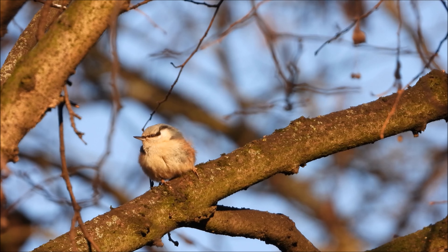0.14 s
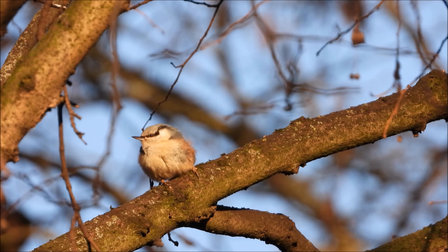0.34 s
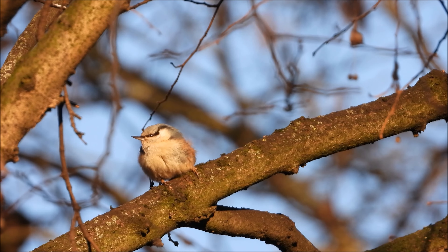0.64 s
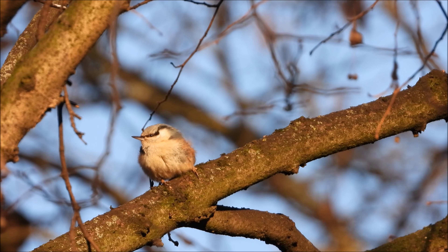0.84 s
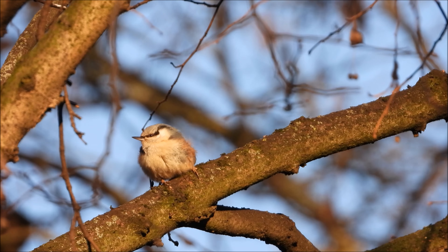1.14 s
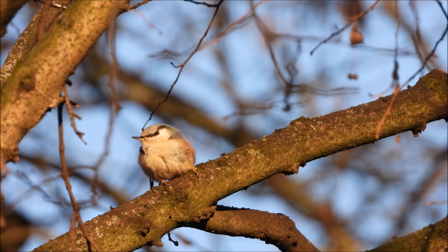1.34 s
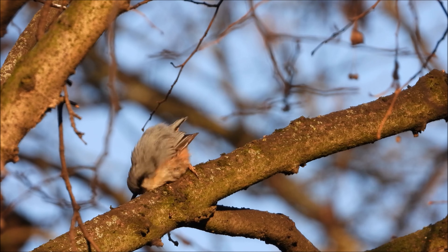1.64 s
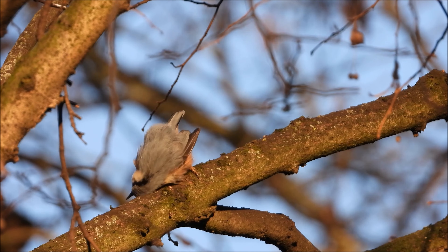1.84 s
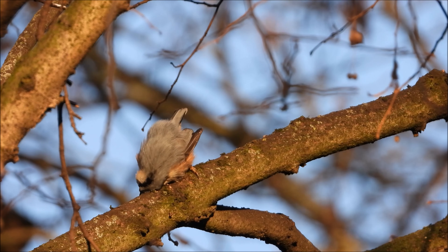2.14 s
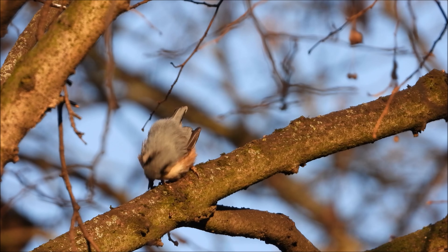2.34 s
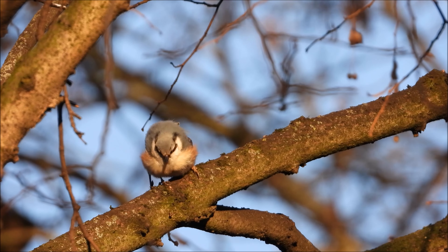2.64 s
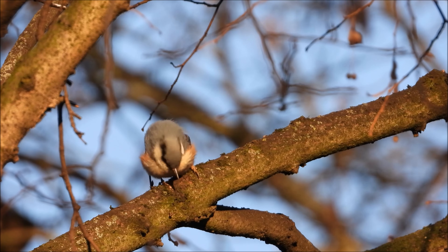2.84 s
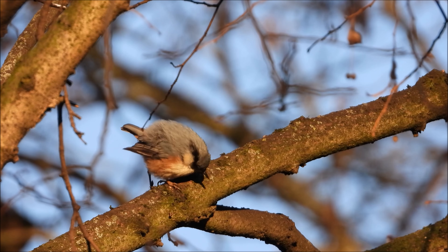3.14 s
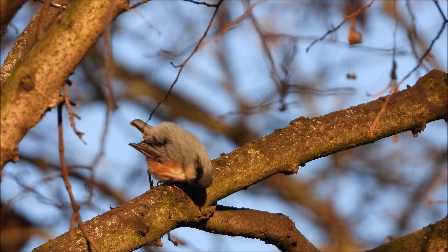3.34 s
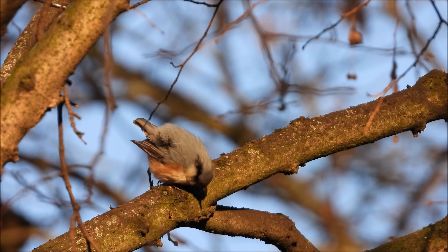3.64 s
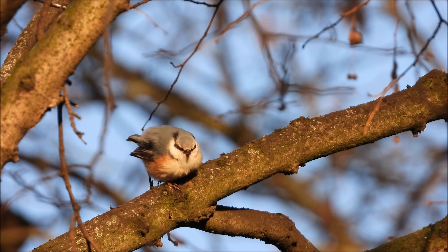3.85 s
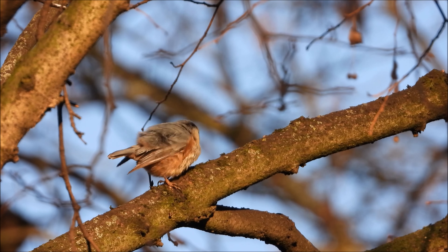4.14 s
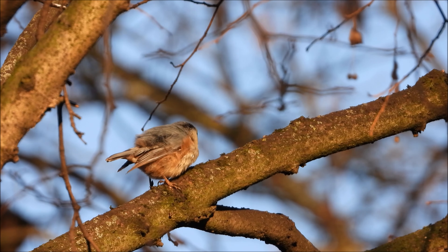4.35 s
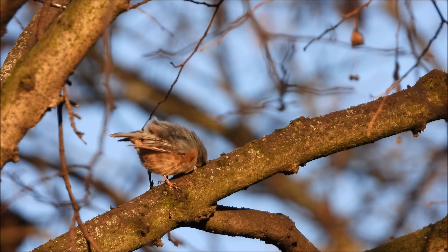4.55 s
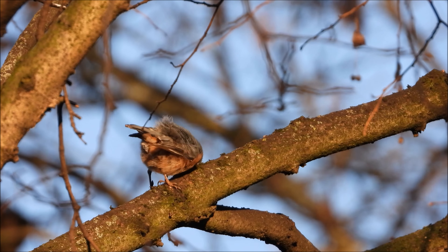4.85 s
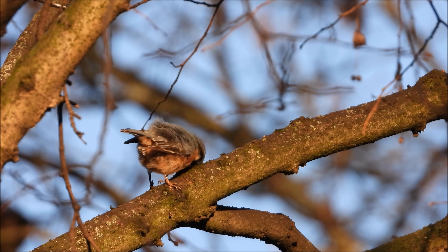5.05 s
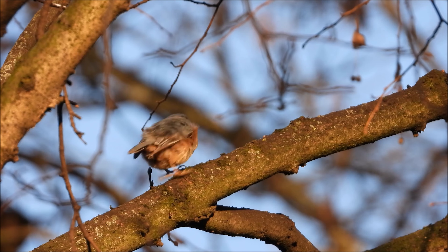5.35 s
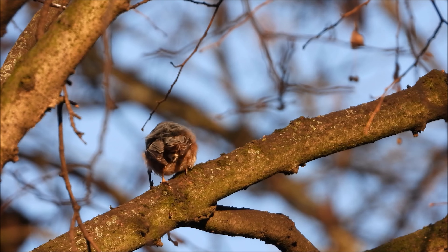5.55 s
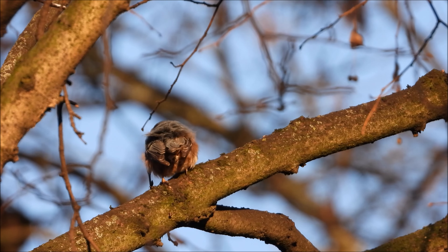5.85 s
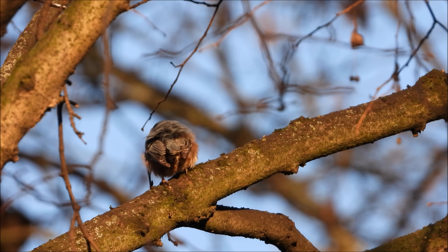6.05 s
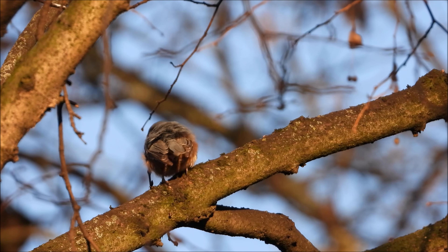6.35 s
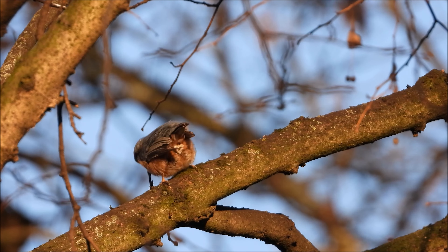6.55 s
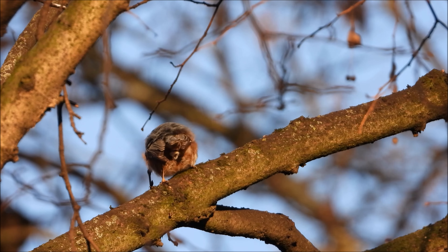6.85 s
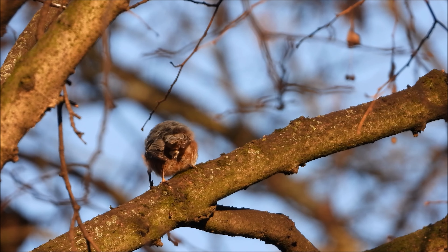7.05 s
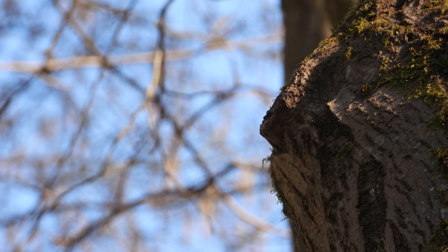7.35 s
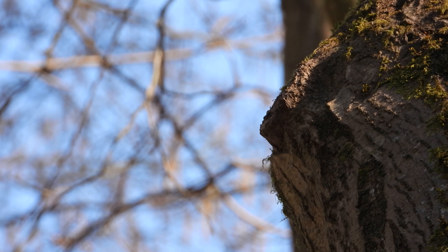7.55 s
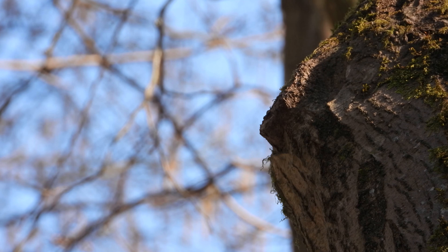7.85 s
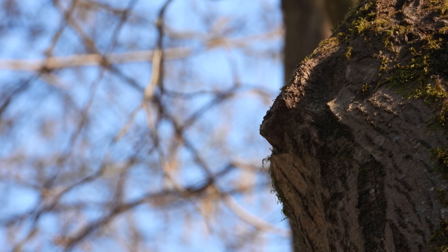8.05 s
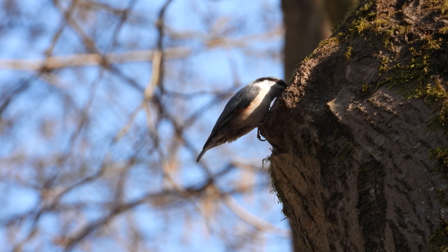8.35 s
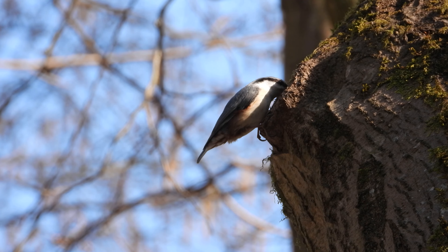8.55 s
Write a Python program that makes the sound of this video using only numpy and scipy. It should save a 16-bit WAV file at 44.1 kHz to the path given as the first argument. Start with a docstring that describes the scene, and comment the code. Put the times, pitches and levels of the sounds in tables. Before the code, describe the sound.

In a wood, a small bird repeats a high pip, pure whistle and falling buzz about twice a second, stopping after five seconds. Further off, another bird sings fluted glides and hoarse slurs that echo among the trees and carry on to the end. Thin calls and a faint trill join later. Distant traffic and a low rumble of air on the microphone lie underneath.

```python
"""Songbirds in a bare wood.

A tit repeats a pip, a pure whistle and a falling buzz twice a second. Further off, a thrush sings fluted
glides and hoarse slurs, and small birds add thin calls. Each note is one gliding syrinx tone; trunks
scatter it into a short tail. One dry tick. Beneath: far traffic, a hum, air rumble on the microphone."""
import sys
import numpy as np
from scipy import signal
from scipy.fft import rfft, irfft, next_fast_len
from scipy.io import wavfile
from scipy.ndimage import uniform_filter1d, map_coordinates

SR = 44100
rng = np.random.default_rng(int(sys.argv[2]) if len(sys.argv) > 2 else 0)


def master(y):
    """Save y as 16-bit WAV."""
    cut = np.clip(np.atleast_2d(y).T, -1, 1)
    pcm = np.round(cut * 32767)  # scale
    wavfile.write(sys.argv[1], SR, pcm.astype(np.int16))


N = 384111

# distant traffic and leaves: f/Hz, relative density/dB
HUSH_SPECTRUM = [(36, -1.5), (51, 9), (78, -11), (110, -8.5), (155, -18), (300, -11), (480, -14),
                 (750, -16.5), (1150, -25.5), (1600, -33), (3000, -33.5), (8000, -43.5), (11700, -43.5),
                 (12400, -61)]
# far hum: t/s, level/dB
HUM_ENVELOPE = [(0, -95.5), (2.5, -82), (3, -77.5), (4.4, -77.5), (5, -81), (5.8, -74.5), (7.2, -76.5),
                (8.7, -88.5)]
# gusts on the microphone: peak t/s, half-width/s, level/dB
AIR_GUSTS = [(.22, .06, -27), (1.2, .2, -47), (5.55, .05, -32), (5.73, .09, -28), (7.08, .06, -39)]
# air rumble: f/Hz, relative density/dB
AIR_SPECTRUM = [(4, -33), (9, 3.5), (15, 1), (21, 4), (29, -23), (38, -40), (80, -54.5), (200, -103.5)]
# tit phrases: whistle t/s, whistle level/dB, whistle f/Hz, pip level/dB, buzz t/s, buzz level/dB
TIT_PHRASES = [ (0.132, -56, 4276, -76, .329, -51.5), (0.641, -48.5, 4290, -67.5, .828, -45.5),
               (1.119, -42.5, 4236, -56, 1.305, -48.5), (1.602, -41.5, 4216, -61.5, 1.783, -48),
               (2.102, -40, 4208, -63.5, 2.285, -47), (2.588, -41, 4220, -62.5, 2.777, -46),
               (3.063, -43, 4212, -63, 3.251, -48), (3.55, -43.5, 4208, -58, 3.738, -49),
               (4.061, -50.5, 4200, -62.5, 4.252, -48.5), (4.554, -44.5, 4214, -57.5, 4.753, -49.5),
               (5.05, -46.5, 4200, -54, 5.242, -51.5)]
# tit pip: t/s from onset, f/Hz, relative level/dB
PIP_SHAPE = [(0, 3600, -13.5), (.01, 3540, 0.5), (.018, 3670, 4), (.026, 3780, -7.5)]
# tit whistle: t/s from onset, nominal f/Hz, relative level/dB
WHISTLE_SHAPE = [(0, 4010, -22), (.015, 4130, -7), (.036, 4210, 0), (.06, 4220, -.5), (.073, 4210, -1.5),
                 (.082, 4200, -11)]
# tit buzz: t/s from onset, nominal f/Hz, relative level/dB
BUZZ_SHAPE = [(0, 5850, -12), (.005, 5550, -6), (.01, 5080, -3), (.016, 4730, -.5), (.045, 4570, -1),
              (.075, 4420, .5), (.098, 4390, -1), (.11, 4400, -12)]
# fluted notes: t/s, length/s, start f/Hz, mid f/Hz, end f/Hz, relative level/dB, swell/dB,
# echo send/dB, roughness
THRUSH_NOTES = [ (0.848, 0.1, 1507, 1903, 1920, -51.5, 12.5, 5, 0.46),
                (1.07, 0.067, 2386, 2010, 1660, -50, -3.5, 6.5, 0.46),
                (1.164, 0.073, 2113, 2342, 2320, -43, 6.5, -0.5, 0),
                (1.31, 0.09, 2790, 2842, 2870, -52, -2.5, 3.5, 0.2),
                (1.409, 0.055, 2900, 2467, 1590, -50, -9.5, 7.5, 0.54),
                (1.723, 0.18, 1334, 1763, 1636, -51, 19, 2, 0.38),
                (2.137, 0.16, 1994, 2230, 2240, -48.5, -10, 0, 0.19),
                (2.302, 0.17, 2220, 1848, 1667, -49.5, -10, 0, 0.31),
                (2.739, .16, 2586, 2107, 1916, -49, 14.5, 4, .1),
                (3.194, 0.069, 2397, 2210, 2213, -44, 7, -5, 0),
                (3.386, .145, 2778, 2760, 2306, -56, 13.5, 5, 0.13),
                (5.219, 0.15, 1797, 1958, 2043, -73, 18, 10, 0.15),
                (5.618, 0.04, 2250, 2020, 1640, -47.5, -1.5, 1, 1.08),
                (5.699, 0.14, 1447, 1897, 1892, -51.5, 10.5, 3, 0.45),
                (5.987, .057, 2188, 1776, 1483, -52.5, -7, 6.5, 0.74),
                (6.043, .095, 1550, 2172, 2337, -47.5, 12.5, 3, 0.2),
                (6.228, .1, 2794, 2806, 2741, -53.5, 5, 6, 0.02),
                (6.332, .052, 2808, 2390, 1625, -48, -7, 4.5, 0.7),
                (6.628, 0.072, 1340, 1490, 1760, -54.5, 17, -1, 0.4),
                (6.686, 0.2, 1740, 1850, 1695, -47, -2, -0.5, 0.45),
                (7.054, 0.091, 2178, 2187, 2132, -44, -5, -10.5, 0.08),
                (7.879, 0.15, 3010, 2735, 2530, -51.5, 3, -1.5, 0.32),
                (8.674, 0.051, 2205, 2360, 2460, -59.5, 11, 8, 0.4)]
# hoarse slurs: t/s, length/s, start f/Hz, end f/Hz, relative level/dB
THRUSH_SLURS = [ (0.661, 0.04, 3100, 2480, -60), (0.714, .024, 1887, 3990, -52.5),
                (0.749, 0.021, 3700, 2690, -59.5), (0.774, 0.035, 2320, 1820, -48.5),
                (0.862, .04, 2535, 2795, -52), (0.91, 0.021, 2740, 3770, -57.5),
                (0.963, .018, 3980, 2680, -51), (0.967, .035, 2800, 2035, -52.5),
                (1.608, 0.06, 3600, 2450, -60.5), (1.668, 0.064, 2457, 3250, -59.5),
                (1.752, 0.053, 3010, 2114, -61), (2.042, 0.072, 1540, 1335, -61.5),
                (2.09, 0.029, 2070, 2930, -65.5), (2.095, 0.03, 1323, 1380, -62.5),
                (2.907, 0.028, 1940, 1570, -50.5), (3.054, 0.05, 1820, 1222, -57.5),
                (3.088, 0.071, 1260, 1460, -68), (3.131, 0.035, 1517, 2034, -60.5),
                (3.173, .028, 1652, 2734, -51.5), (3.518, 0.037, 2350, 1370, -58),
                (4.574, 0.022, 1570, 2870, -61), (4.597, .078, 2620, 2570, -67.5),
                (4.601, 0.079, 1380, 1237, -79.5), (4.754, 0.032, 2365, 1750, -64.5),
                (4.759, 0.027, 3460, 2840, -62.5), (4.788, 0.057, 1590, 1490, -75),
                (4.918, 0.029, 2074, 2410, -65), (4.921, 0.022, 3150, 2680, -62),
                (5.003, 0.087, 3090, 2430, -63.5), (5.351, .028, 2035, 2930, -54),
                (5.375, 0.12, 1735, 1430, -73.5), (5.571, 0.029, 2930, 2960, -62),
                (6.088, 0.025, 2310, 2850, -65), (6.378, 0.034, 2660, 3460, -55.5),
                (6.409, 0.041, 2340, 2987, -48), (6.498, 0.031, 2950, 3930, -58.5),
                (6.53, 0.029, 2530, 3264, -48), (6.599, 0.092, 3176, 2804, -52),
                (6.709, 0.04, 2800, 2496, -48.5), (6.841, 0.013, 4540, 3700, -68),
                (6.856, 0.036, 3650, 3460, -60.5), (6.865, 0.1, 2947, 3375, -56),
                (6.971, 0.075, 2353, 2954, -55.5), (7.62, 0.051, 1880, 2335, -73.5),
                (7.621, 0.044, 2904, 3560, -62.5), (7.654, 0.028, 2220, 3220, -55),
                (7.746, 0.027, 3020, 3720, -55.5), (7.769, 0.034, 2420, 3300, -52.5),
                (7.85, 0.038, 3150, 3094, -54), (8.115, 0.017, 4960, 3340, -67),
                (8.135, 0.034, 2917, 2176, -61), (8.171, 0.093, 2600, 3270, -61),
                (8.25, 0.061, 3350, 3364, -62.5)]
# echo of an earlier phrase dying in the trees: f/Hz, relative density/dB
LINGER_SPECTRUM = [(1400, -35), (1750, -9.5), (1950, 6), (2250, -15.5), (2550, -2.5), (2950, 0),
                   (3250, -20), (4000, -34)]
# faint far calls: t/s, length/s, start f/Hz, end f/Hz, level/dB
FAR_GLIDES = [ (3.605, 0.038, 8900, 7030, -88), (4.458, 0.18, 2326, 2270, -83.5),
              (5.477, 0.39, 8000, 7540, -102), (5.988, 0.075, 7200, 6000, -94),
              (6.143, 0.04, 7530, 4930, -76), (6.257, 0.042, 6050, 5320, -68),
              (6.287, 0.021, 5650, 3500, -63.5), (6.257, .24, 7880, 7500, -87.5),
              (6.786, 0.032, 8000, 7300, -92), (8.364, 0.16, 4260, 4305, -75)]
# thin buzzy call: t/s, f/Hz, relative level/dB
HIGH_BUZZ_SHAPE = [(1.92, 7340, -70.5), (1.98, 7100, -77), (2.0, 6040, -72), (2.03, 6900, -103)]
# one trill note: t/s from onset, f/Hz, relative level/dB
TRILL_SHAPE = [(0, 5650, -76.5), (.02, 5320, -71), (.04, 5200, -75.5)]
# dry tick: f/Hz, relative density/dB
TICK_SPECTRUM = [(2000, -20), (3200, -8), (5500, -3), (7500, 0), (9800, 0), (12000, -8), (13000, -21),
                 (16000, -26)]


def undb(db):
    """Decibels to gain."""
    return 10 ** (np.asarray(db) / 20)


def noise(spectrum):
    """Unit-rms noise shaped by (f/Hz, density/dB) rows."""
    hz, db = np.transpose(spectrum)
    size = next_fast_len(N)
    bins_hz = np.maximum(np.fft.rfftfreq(size, 1 / SR), 1)
    gain = undb(np.interp(np.log(bins_hz), np.log(hz), db))
    shaped = irfft(rfft(rng.standard_normal(size)) * gain, size)[:N]
    return shaped / np.sqrt(np.mean(shaped ** 2))


def wander(t, rate_hz):
    """Smooth random curve, spread near 1."""
    knots = rng.standard_normal(1024)
    return map_coordinates(knots, [t * rate_hz], order=3, mode="wrap")


def glide(length_s, start_hz, end_hz, mid_hz=None, swell_db=0,
          edge_db=-9.5, attack_s=.014, release_s=.017):
    """Note shape (t/s, f/Hz, level/dB): one pitch arc under attack, sloping hold and release."""
    u = np.linspace(0, 1, 41)
    t = u * length_s
    bow_hz = 0 if mid_hz is None else mid_hz - (start_hz + end_hz) / 2
    hz = start_hz + (end_hz - start_hz) * u + bow_hz * (1 - (2 * u - 1) ** 2)
    edges = np.maximum(1 - t / attack_s, 0) ** 2 + np.maximum(1 - (length_s - t) / release_s, 0) ** 2
    return np.column_stack([t, hz, swell_db * (u - .5) + edge_db * edges])


def syrinx(track, shape, at_s=0, db=0, pitch_ratio=1, swing_hz=0, flutter_hz=222.7,
           waver=.0086, waver_rate_hz=130, tremor_db=0):
    """Add one gliding tone to track. Regular flutter makes it buzz; quick random waver, hoarse."""
    times_s, pitch_hz, level_db = np.transpose(shape)
    t = np.arange(max(int((times_s[-1] - times_s[0]) * SR), 256)) / SR
    hz = pitch_ratio * uniform_filter1d(np.interp(t + times_s[0], times_s, pitch_hz), size=256)
    flutter = np.sin(2 * np.pi * np.cumsum(flutter_hz * (1 + .07 * wander(t, 60))) / SR)
    hz = hz * (1 + waver * wander(t, waver_rate_hz)) + swing_hz * flutter
    fades = np.sin(np.pi / 2 * np.clip(np.minimum(t, t[-1] - t) / .004, 0, 1)) ** 2
    envelope_db = db + np.interp(t + times_s[0], times_s, level_db) + tremor_db * wander(t, 106.8)
    tone = np.sqrt(2) * fades * undb(envelope_db) * np.sin(2 * np.pi * np.cumsum(hz) / SR)
    start = int(np.clip((at_s + times_s[0]) * SR, 0, N))
    track[start:start + len(tone)] += tone[:N - start]


def echoes(x, wet_db, t60_s, build_s, cutoff_hz=16000):
    """Uneven, low-passed scatter from trunks and branches; builds, then decays. No direct sound."""
    t = np.arange(int(1.5 * SR)) / SR
    scatter = rng.standard_normal(len(t)) * undb(2 * wander(t, 90))
    response = scatter * (1 - np.exp(-t / build_s)) * undb(-60 * t / t60_s)
    lowpass = signal.butter(10, cutoff_hz, fs=SR, output="sos")
    response = signal.sosfilt(lowpass, response / np.linalg.norm(response))
    return undb(wet_db) * signal.fftconvolve(x, response)[:N]


def background(hush_db=-63, hum_hz=432.6, air_db=-41):
    """Hush of traffic and leaves, a wavering far hum, air pressing on the microphone."""
    t = np.arange(N) / SR
    hush = noise(HUSH_SPECTRUM) * undb(hush_db + .6 * wander(t, 1.5))
    hum = np.sqrt(2) * np.sin(2 * np.pi * np.cumsum(hum_hz + 3 * wander(t, 14)) / SR)
    hum *= undb(np.interp(t, *np.transpose(HUM_ENVELOPE)) + 2 * wander(t, 8))
    gusts = sum(undb(db) * np.exp(-((t - peak_s) / width_s) ** 2) for peak_s, width_s, db in AIR_GUSTS)
    return hush + hum + noise(AIR_SPECTRUM) * (undb(air_db) + gusts)


def tit(pip_lead_s=.038, send_pivot_db=-42, send_slope=.41, buzz_spread=.012, swing_hz=255):
    """Pip, whistle and falling buzz, nearly alike in every phrase."""
    direct, send, buzzes = np.zeros((3, N))
    for whistle_s, whistle_db, whistle_hz, pip_db, buzz_s, buzz_db in TIT_PHRASES:
        ratio = whistle_hz / WHISTLE_SHAPE[2][1]
        syrinx(direct, WHISTLE_SHAPE, whistle_s, whistle_db, ratio, waver=.001)
        # head turns vary the direct whistle more than the sound sent into the trees
        send_db = send_pivot_db + send_slope * (whistle_db - send_pivot_db)
        syrinx(send, WHISTLE_SHAPE, whistle_s, send_db, ratio, waver=.0037)
        for track in (direct, send):
            syrinx(track, PIP_SHAPE, whistle_s - pip_lead_s, pip_db)
        ratio = 1 + buzz_spread * rng.uniform(-1, 1)
        syrinx(buzzes, BUZZ_SHAPE, buzz_s, buzz_db, ratio, swing_hz, waver=.008, tremor_db=1.5)
    syrinx(buzzes, BUZZ_SHAPE, at_s=8.54, db=-55.5, swing_hz=swing_hz)  # lone late buzz
    tail = echoes(send, wet_db=-8.5, t60_s=.95, build_s=.015)
    # near twigs scatter the buzz's bright start; far trunks return only its lower part
    twigs = echoes(buzzes, wet_db=-3.5, t60_s=.37, build_s=.005)
    trunks = echoes(buzzes, wet_db=-2.5, t60_s=.82, build_s=.015, cutoff_hz=4950)
    return direct + tail + buzzes + twigs + trunks


def thrush(note_trim_db=-.5, slur_trim_db=-1.5, linger_db=-71.5, linger_fall_db_per_s=33):
    """Fluted glides and hoarse slurs from deeper in the wood, heard largely as echoes."""
    direct, send, slurs = np.zeros((3, N))
    for at_s, length_s, start_hz, mid_hz, end_hz, db, swell_db, send_db, roughness in THRUSH_NOTES:
        note = glide(length_s, start_hz, end_hz, mid_hz, swell_db)
        waver = .0033 + .034 * roughness
        syrinx(direct, note, at_s, db + note_trim_db, waver=waver, waver_rate_hz=250, tremor_db=3)
        syrinx(send, note, at_s, db + send_db, waver=waver, waver_rate_hz=250, tremor_db=2)
    for at_s, length_s, start_hz, end_hz, db in THRUSH_SLURS:
        slur = glide(length_s, start_hz, end_hz)
        syrinx(slurs, slur, at_s, db + slur_trim_db, waver=.024, waver_rate_hz=450, tremor_db=2)
    note_tail = echoes(send, wet_db=-1.5, t60_s=1.0, build_s=.0058)
    linger = noise(LINGER_SPECTRUM) * undb(linger_db - linger_fall_db_per_s * np.arange(N) / SR)
    slur_tail = echoes(slurs, wet_db=6, t60_s=1.05, build_s=.008)
    return direct + note_tail + linger + slurs + slur_tail


def small_birds(trill_start_s=6.42, trill_end_s=7.65, trill_rate_hz=11.7):
    """Thin wavering calls, a high buzz and an even trill, far off."""
    calls = np.zeros(N)
    for at_s, length_s, start_hz, end_hz, db in FAR_GLIDES:
        call = glide(length_s, start_hz, end_hz)
        syrinx(calls, call, at_s, db, waver=.0066, waver_rate_hz=470, tremor_db=.5)
    syrinx(calls, HIGH_BUZZ_SHAPE, db=-3, swing_hz=380, waver=.025, waver_rate_hz=400)
    for at_s in np.arange(trill_start_s, trill_end_s, 1 / trill_rate_hz):
        syrinx(calls, TRILL_SHAPE, at_s, db=-16.5, waver=.018)
    return calls + echoes(calls, wet_db=4, t60_s=.6, build_s=.006)


def tick(at_s=3.792, gain_db=-50, attack_s=.003, decay_s=.0091):
    """Short bright tsik call among the branches."""
    t = np.maximum(np.arange(N) / SR - at_s, 0)
    envelope = (1 - np.exp(-t / attack_s)) * np.exp(-t / decay_s)
    tsik = undb(gain_db) * noise(TICK_SPECTRUM) * envelope
    return tsik + echoes(tsik, wet_db=-8, t60_s=.2, build_s=.008)


def scene():
    """Birds and air at one microphone."""
    return (tit() + thrush() + small_birds() + tick() + background())[None]


def record(dry):
    """Steep low-pass on the top treble."""
    cutoff_hz = 15800
    return signal.sosfilt(signal.ellip(8, .2, 70, cutoff_hz, fs=SR, output="sos"), dry)


dry = scene()
out = record(dry)
master(out)
```